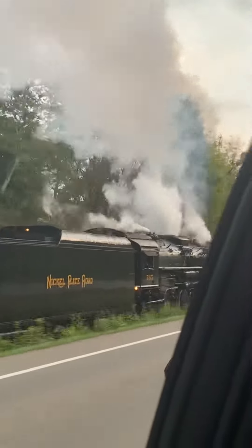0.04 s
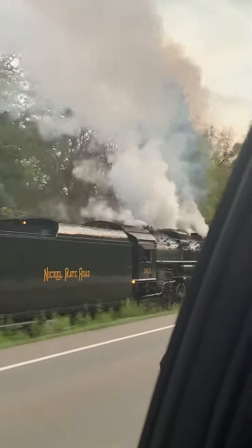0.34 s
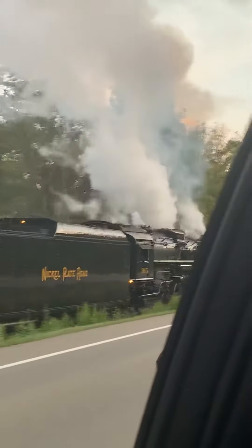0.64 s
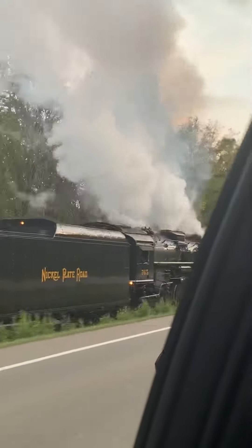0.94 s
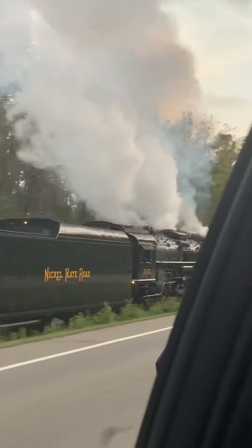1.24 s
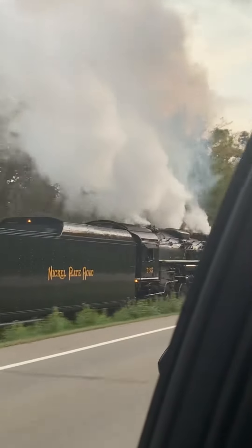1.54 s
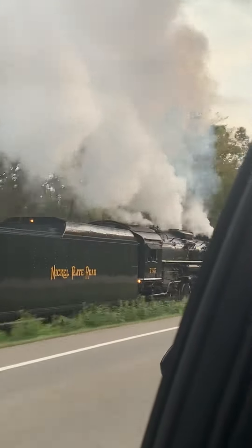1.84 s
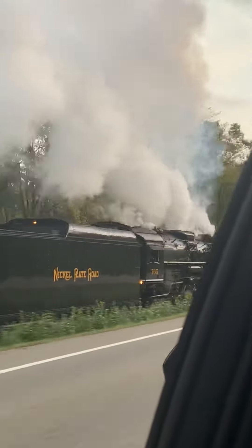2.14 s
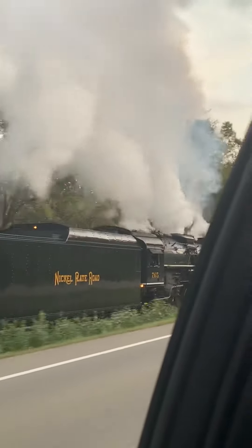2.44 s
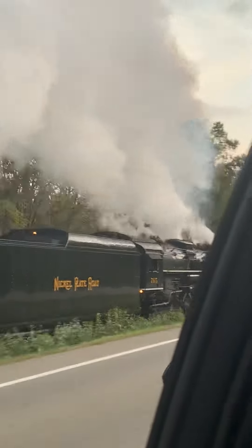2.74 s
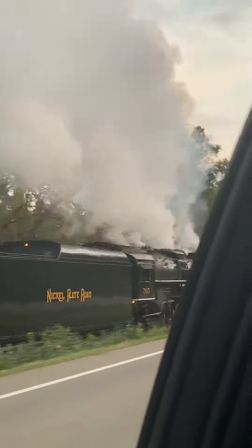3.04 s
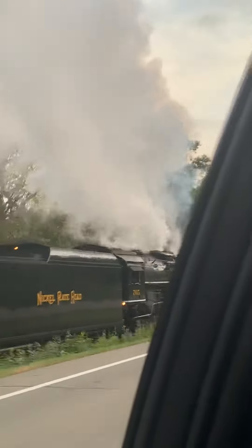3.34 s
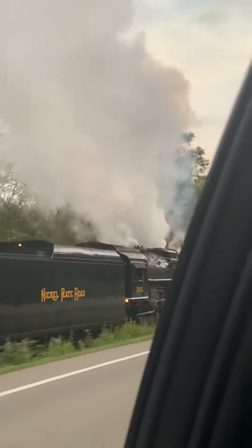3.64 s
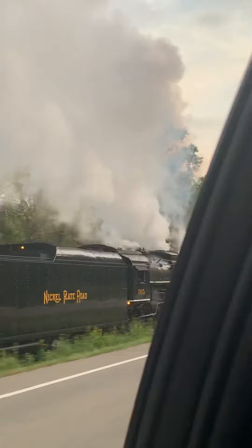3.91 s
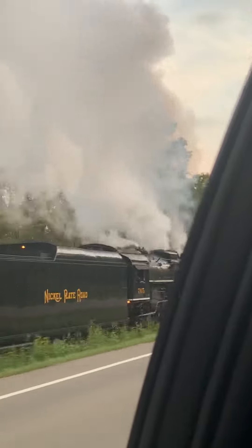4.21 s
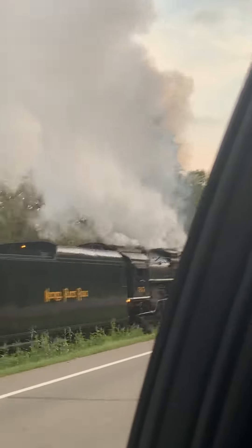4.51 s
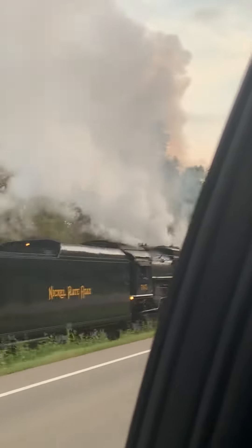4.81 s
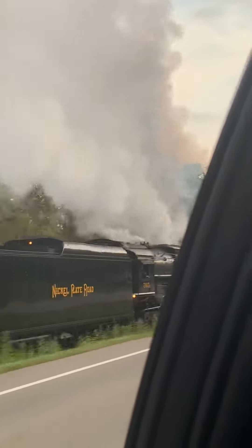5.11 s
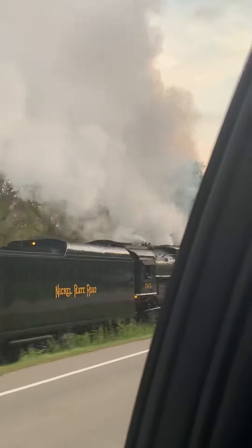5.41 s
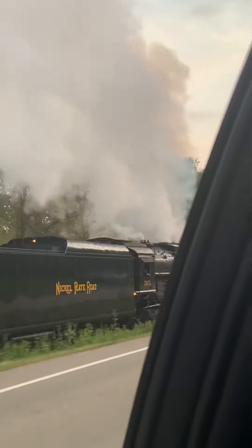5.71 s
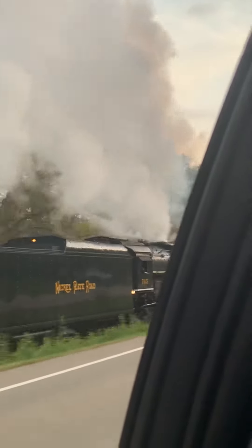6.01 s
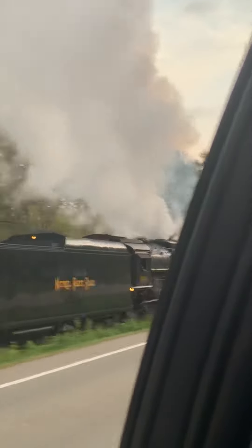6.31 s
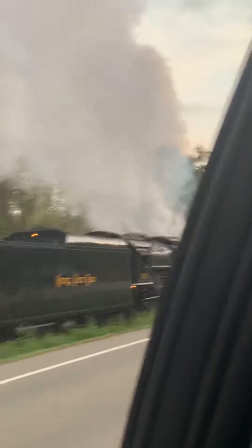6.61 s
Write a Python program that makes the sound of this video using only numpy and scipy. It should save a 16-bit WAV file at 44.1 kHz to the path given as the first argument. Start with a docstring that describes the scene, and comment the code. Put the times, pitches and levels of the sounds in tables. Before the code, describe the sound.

A steam locomotive sounds its whistle in one long, loud blast, a chord with a thin shriek flaring above it. The pitch creeps up, then sags as the whistle turns hoarse and a little quieter. Steam roars, hisses and spits throughout, and the engine and wheels rush along underneath. The microphone is at the open window of a car keeping pace, with close road rumble and gusts of wind.

```python
"""A loud chord from a steam locomotive's six-chime whistle, held in one long blast.
The microphone rides at the open window of a car that keeps pace on the road beside the train.
The chord rises with the steam pressure, then sags and turns hoarse as the valve eases. A shriek flares
above it and the steam jet roars, hisses and spits. Engine and wheels run alongside; close up are
road rumble and wind."""
import sys
import numpy as np
from scipy import signal
from scipy.fft import rfft, irfft, next_fast_len
from scipy.io import wavfile
from scipy.ndimage import uniform_filter1d, map_coordinates

SR = 44100
rng = np.random.default_rng(int(sys.argv[2]) if len(sys.argv) > 2 else 0)


def transcribe(signal):
    """Save signal, clipped to [-1, 1], as a 16-bit WAV file at the path in sys.argv[1]."""
    frames = np.atleast_2d(signal).T
    limited = np.clip(frames, -1, 1)
    pcm = np.round(limited * 32767).astype(np.int16)
    wavfile.write(sys.argv[1], SR, pcm)


N = 293706
TIME = np.arange(N) / SR


def amp(db):
    """Decibels to gain."""
    return 10 ** (np.asarray(db) / 20)


def unit(x):
    """x at rms 1."""
    return x / np.sqrt(np.mean(np.abs(x) ** 2) + 1e-20)


def along(points, hz):
    """(Hz, value) points read on a log axis."""
    freqs, values = np.transpose(points)
    return np.interp(np.log(hz + 1), np.log(freqs + 1), values)


def curve(rows):
    """(seconds, value) points joined into one value per sample."""
    return np.interp(TIME, *np.transpose(rows))


def bell(centre_s, width_s):
    """A bell-shaped swell of height 1."""
    return np.exp(-.5 * ((TIME - centre_s) / width_s) ** 2)


def swells(rows):
    """Gain that swells out of silence for each (seconds, dB, width) row."""
    return sum(amp(db) * bell(s, width) for s, db, width in rows)


def accents(rows):
    """A brief change of level, in dB, for each (seconds, dB, width) row."""
    return sum(db * bell(s, width) for s, db, width in rows)


def wobble(rate):
    """A smooth random curve, rate knots a second."""
    knots = rng.standard_normal(4096)
    coarse = np.arange(0, N + 32, 32)
    return np.interp(np.arange(N), coarse, map_coordinates(knots, [coarse * rate / SR], mode="wrap"))


def filtered(x, response):
    """x times a complex response of frequency."""
    size = next_fast_len(N + 8192)
    return irfft(rfft(x, size) * response(np.fft.rfftfreq(size, 1 / SR)), size)[..., :N]


def turbulence(spectrum, patchy_db):
    """Two unrelated noises of rms 1, the (shared, differing) stereo parts, with patches of random gain."""
    noise = signal.stft(rng.standard_normal((2, N)), nperseg=512)[2]
    patches = uniform_filter1d(rng.standard_normal(noise.shape[1:]), size=7, axis=0)
    patches = uniform_filter1d(patches, size=10, axis=1)
    pair = signal.istft(noise * amp(patchy_db * unit(patches)), nperseg=512)[1][:, :N]
    return unit(filtered(pair, lambda hz: amp(along(spectrum, hz))))


def flutter(width_hz):
    """The random complex envelope of a pipe resonance that turbulence drives."""
    coarse = np.arange(0, N + 32, 32)
    hz = np.fft.fftfreq(len(coarse), coarse[1] / SR)
    real, imag = rng.standard_normal((2, len(coarse)))
    resonance = 1 / (1 + 2j * hz / width_hz) / (1 + 1j * hz / (2 * width_hz))
    return np.interp(np.arange(N), coarse, unit(np.fft.ifft((real + 1j * imag) * resonance)))


def partial(phase, rough, width_hz):
    """A tone as (shared, differing) stereo parts; rough is the fraction of flutter in the shared part."""
    shared = np.sqrt(1 - rough) + np.sqrt(rough) * flutter(width_hz)
    carrier = np.sqrt(2) * np.exp(1j * (phase + rng.uniform(0, 2 * np.pi)))
    return (np.array([shared, flutter(width_hz)]) * carrier).real


def shaken(hz, jitter):
    """Phase of a pipe whose pitch the unsteady jet shakes."""
    return 2 * np.pi * np.cumsum(hz * (1 + jitter * wobble(35))) / SR


# Steam through the whistle valve. Each row: time in seconds, flow in dB relative to wide open.
VALVE_FLOW = [(0, -0.2), (1.3, 0), (1.85, -0.7), (2.2, -2), (3.2, -1.8), (3.85, -2.2), (4.4, -2.3),
              (4.8, -4), (5.4, -5.5), (5.9, -5), (6.66, -5.5)]

def driven(base_db, growth):
    """Level in dB of a voice that gains growth dB for each dB of steam flow."""
    return base_db + growth * curve(VALVE_FLOW)


# The chord's rise and sag, used as a ratio. Each row: time in seconds, guide pitch in Hz.
PITCH_ARC = [(0, 304.2), (.15, 310.4), (.32, 314), (.65, 315.9), (1.1, 317.1), (2, 319.2), (2.7, 319.8),
             (3.6, 321.9), (4.3, 319.9), (4.75, 314.3), (5.1, 309.4), (5.6, 305.7), (6.1, 302.4),
             (6.66, 301.7)]

def pressure():
    """Steam pressure as the ratio by which it bends the pitch: near 1 in the held part of the blast."""
    pitch = curve(PITCH_ARC)
    return pitch / np.median(pitch[:N * 2 // 3])


# Clean tone breaking up into flutter. Each row: time in seconds, hoarseness (0 is clean).
HOARSENESS = [(0, 0.35), (.25, 0.44), (.4, 0.17), (2, 0.22), (3, 0.29), (3.8, 0.46), (4.4, 0.4),
              (4.75, 0.3), (5.1, 1.07), (6.66, 1.4)]
# Overblowing moves the sound into the overtones. Each row: time in seconds, strength in dB.
OVERBLOWING = [(0, -1), (1.5, -1), (2.3, 1.5), (3.1, 4), (3.9, 3.5), (4.3, 0), (5, 0.5), (5.5, -4.5),
               (6.66, -4)]

def pipes(table, note_db, harmonics, width_hz, spread, jitter):
    """Pipes on one steam valve: they bend together, and their higher partials are broader and rougher."""
    hoarse, overblow_db = curve(HOARSENESS), curve(OVERBLOWING)
    lower_db = driven(-24.5, growth=.66) + overblow_db
    upper_db = driven(-24, growth=1.36) + .2 * overblow_db
    ratio = pressure()
    out = np.zeros((2, N))
    for hz, bend, roughness, *levels in table:
        phase = shaken(hz * ratio ** bend, jitter)
        for k, db in zip(harmonics, levels):
            drive_db = note_db if k == 1 else lower_db if k <= 3 else upper_db
            rough = 1 - np.exp(-hoarse * roughness * 1.24 * np.sqrt(k))
            out += amp(db + drive_db) * partial(phase * k, rough, width_hz * k ** spread)
    return out


# Three pairs of pipes, over on the locomotive. Each row: pitch in Hz at pressure 1, bend exponent,
# roughness factor, then a relative level in dB for each harmonic listed in whistle().
LONG_PIPES = [(319.5, 0.96, 0.52, -1.8, -14.5, -2, -12, -17, -19.5),
              (355.8, .9, 0.9, -7, -9, -29, -12.5, -18.5, -16.5)]
MIDDLE_PIPES = [(403.4, 1.05, 0.63, -1, -3, -9, -16, -25), (423.7, 1.05, 1.3, -6, -10.5, -14, -18.5, -28)]
SHORT_PIPES = [(548.4, 1.6, 1.42, -0.7, -7.5, -8, -15.5), (617, 1.2, 7.7, -12.5, -9, -12.5, -33)]
# The short pipes falter and catch again. Each row: centre in seconds, change in dB, width in seconds.
PIPE_STUTTERS = [(.6, 2.5, 0.32), (2.2, -3, 0.037), (2.44, 2, .03), (2.8, -6.5, 0.07), (3.2, 0, 0.034),
                 (3.56, -4, 0.037), (3.92, -5, 0.087), (4.24, 5.5, 0.052), (4.78, 6.5, .05),
                 (5.02, 4, 0.058), (6.55, -4.5, .12)]
# Steam noise at the pipe lips. Each row: frequency in Hz, relative level in dB.
LIP_SPECTRUM = [(200, -38), (265, -14), (305, 4.5), (360, 1), (425, 3), (470, -22), (600, -41)]

def whistle():
    """Six chimes sound a chord, rich in odd overtones, with noisy steam at their lips."""
    low_db, middle_db = driven(-15, growth=1.47), driven(-19, growth=.75)
    # The short pipes' fundamentals come up late and give way when they overblow.
    speak_s, rise_s = .26, .087
    late_db = -6 * np.clip((speak_s - TIME) / rise_s + .5, 0, 1)
    give_way_db = -.35 * np.maximum(curve(OVERBLOWING), 0)
    high_db = driven(-19, growth=1.01) + late_db + give_way_db + accents(PIPE_STUTTERS)
    low = pipes(LONG_PIPES, low_db, (1, 3, 5, 7, 9, 11), width_hz=27, spread=.57, jitter=.00298)
    middle = pipes(MIDDLE_PIPES, middle_db, (1, 3, 5, 7, 9), width_hz=20, spread=.36, jitter=.00303)
    high = pipes(SHORT_PIPES, high_db, (1, 2, 4, 5), width_hz=31.5, spread=.6, jitter=.00394)
    lips = amp((low_db + middle_db) / 2 - 9.5) * turbulence(LIP_SPECTRUM, patchy_db=-1)
    return low + middle + high + lips


# The shriek flares above the chord. Each row: centre in seconds, gain in dB, width in seconds.
SHRIEK_FLARES = [(.02, 6, 0.051), (.24, 7, 0.11), (.8, 10, .03), (.96, 3.5, 0.057), (1.46, 8.5, 0.055),
                 (2.75, 2.5, 0.28), (3.87, 5.5, 0.076), (5.03, 4.5, 0.12), (5.91, 9.5, 0.044)]

def shriek():
    """A short pipe overblows into a piercing mode that bends with the chord and frays as the valve eases."""
    rough = 1 - np.exp(-1.96 * curve(HOARSENESS))
    level_db = driven(-23, growth=.75) + accents(SHRIEK_FLARES) + 1.36 * wobble(14)
    phase = shaken(hz=1625 * pressure() ** .88, jitter=.0027)
    return amp(level_db) * partial(phase, rough, width_hz=62)


# Steam roar, hiss and top sizzle, coloured by the recorder, which lifts the treble abruptly above 8 kHz.
# Each row: frequency in Hz, relative level in dB.
ROAR_SPECTRUM = [(900, -41), (1500, -16.5), (1780, 0), (1980, 2), (2200, -2), (2340, -5.5), (2550, -4),
                 (2850, -6.5), (3050, -9.5), (3600, -11.5), (4500, -10), (6500, -114)]
HISS_SPECTRUM = [(2500, -10), (3600, 5), (4500, -10), (5500, 6), (6400, 1), (6800, 5), (7300, 1),
                 (7900, 0.5), (9000, -12)]
SIZZLE_SPECTRUM = [(7000, -50), (7880, -49), (8040, 4.5), (8800, -3), (9700, -0.5), (11200, -4.5),
                   (12600, -6), (14500, -12.5), (15800, -15)]
# The hiss puffs up. Each row: centre in seconds, gain in dB, width in seconds.
HISS_PUFFS = [(.2, 1, .04), (1.9, 1.5, 0.045), (3.85, 3, 0.13), (4.35, 1.5, 0.061), (6.28, 5, .08)]
# Wetter steam sizzles more. Each row: time in seconds, gain in dB.
STEAM_WETNESS = [(0, 0.5), (.45, -1.3), (1, 1.8), (1.65, 2), (2.1, -1.3), (3.4, -1.5), (4.4, -3.5),
                 (5.3, -1.5), (6.66, -4.5)]

def steam_jet():
    """The jet roars at the lips and hisses as it spreads; it surges slightly at each driving-wheel turn."""
    turn_s, fade_db_per_s = .44, .3
    surge_db = .12 * np.cos(2 * np.pi * (TIME - 1.9) / turn_s)
    unsteady_db = surge_db + .5 * wobble(45)  # eddies shake the jet
    roar_db = driven(-22, growth=.63) - fade_db_per_s * TIME + unsteady_db
    roar = amp(roar_db) * turbulence(ROAR_SPECTRUM, patchy_db=1.98)
    hiss_db = driven(-28.5, growth=.98) + accents(HISS_PUFFS) + unsteady_db
    hiss = amp(hiss_db) * turbulence(HISS_SPECTRUM, patchy_db=1.7)
    sizzle_db = driven(-25.5, growth=.52) + curve(STEAM_WETNESS) + 1.3 * unsteady_db + .44 * wobble(20)
    sizzle = amp(sizzle_db) * turbulence(SIZZLE_SPECTRUM, patchy_db=1.5)
    return roar + hiss + sizzle


# Wheels and engine, abreast of the car. Each row: frequency in Hz, relative level in dB.
WHEEL_SPECTRUM = [(60, -15), (140, 0.5), (240, -6), (340, -5), (470, -12.5), (620, -5.5), (780, -11.5),
                  (1000, -8.5), (2000, -56)]
ENGINE_SPECTRUM = [(500, -11), (800, -18.5), (900, -5.5), (1000, -1.5), (1150, 3), (1350, 3.5), (1500, 4.5),
                   (1640, 8), (1740, -0.5), (1900, -16), (3000, -31)]
# Their swells and dips. Each row: centre in seconds, change in dB, width in seconds.
WHEEL_ACCENTS = [(.15, 9, .15), (.95, 3, 0.067), (1.5, -3.5, 0.2), (1.95, 3, 0.11), (4.45, 4.5, 0.14),
                 (5.2, -2, 0.24), (6.25, 4, 0.11)]
ENGINE_ACCENTS = [(1.7, -1, 0.066), (3.88, 3, 0.073), (5.06, 3.5, 0.029), (5.8, 3, 0.16),
                  (6.25, 3.5, 0.061)]

def running_train():
    """The engine and its wheels rush along at a constant distance from the microphone."""
    wheel_db = -26.5 + accents(WHEEL_ACCENTS) + 1.9 * wobble(18)
    wheels = amp(wheel_db) * turbulence(WHEEL_SPECTRUM, patchy_db=3.5)
    engine_db = -23.5 + accents(ENGINE_ACCENTS) + .95 * wobble(14)
    return wheels + amp(engine_db) * turbulence(ENGINE_SPECTRUM, patchy_db=2)


# Road and wind, close to the microphone. Each row: frequency in Hz, relative level in dB.
RUMBLE_SPECTRUM = [(8, -12), (25, -2), (50, 1.5), (75, 0.5), (120, -6.5), (180, -16), (400, -57)]
# Gusts at the window. Each row: centre in seconds, level in dB, width in seconds.
WIND_GUSTS = [(.03, -20, 0.035), (.15, -22, 0.034), (.66, -24.5, 0.14), (1.53, -23, 0.022),
              (1.66, -28, 0.022), (2.06, -26, 0.09), (2.63, -23, 0.02), (2.93, -19, 0.023),
              (3.6, -22, 0.034), (4.35, -21.5, 0.034), (5.68, -22, 0.034), (6.09, -23, .05),
              (6.38, -23, .035), (6.54, -27, 0.028)]

def window_rumble():
    """Road rumble and gusts of wind come in at the open car window."""
    gain = amp(-24.5 + 1.5 * wobble(12)) + swells(WIND_GUSTS)
    return gain * turbulence(RUMBLE_SPECTRUM, patchy_db=.5)


# Spits from the whistle. Each row: centre in seconds, level in dB, width in seconds.
SPIT_BURSTS = [(.07, -30, 0.024), (1.84, -20, 0.021), (2.53, -25, 0.04), (3.21, -24, .03),
               (4.87, -25.5, 0.072), (5.91, -25, .03), (6.28, -30, .04)]
# Their bright colour. Each row: frequency in Hz, relative level in dB.
SPIT_SPECTRUM = [(4000, -27), (7500, -2.5), (9000, 2), (12000, -4.5), (15800, -5)]

def spits():
    """Now and then the jet spits wet steam."""
    return swells(SPIT_BURSTS) * turbulence(SPIT_SPECTRUM, patchy_db=1.5)


# Sputters within the chord. Each row: centre in seconds, level in dB, width in seconds.
SPUTTER_BURSTS = [(1.1, -24, 0.03), (2.9, -26.5, 0.043), (3.3, -23, 0.042), (3.47, -24.5, 0.027),
                  (3.66, -28, 0.033), (4.1, -28, 0.05), (4.25, -25, 0.026), (4.37, -17, 0.02)]
# Their hollow colour. Each row: frequency in Hz, relative level in dB.
SPUTTER_SPECTRUM = [(450, -35), (560, -1), (630, 2), (700, -10), (850, -20), (1200, -50)]

def sputters():
    """The short pipes sputter in bursts of noise near their own pitch."""
    return swells(SPUTTER_BURSTS) * turbulence(SPUTTER_SPECTRUM, patchy_db=1)


# A thump right by the microphone. Each row: centre in seconds, level in dB, width in seconds.
HARD_GUST = [(3.77, -13.5, .02)]
# Its deep colour. Each row: frequency in Hz, relative level in dB.
THUMP_SPECTRUM = [(20, -8), (45, 0), (110, -4), (190, -1), (270, -15), (700, -28), (2000, -55)]

def gust_thump():
    """One harder gust thumps at the window."""
    return swells(HARD_GUST) * turbulence(THUMP_SPECTRUM, patchy_db=.5)


# How alike the left and right channels are. Each row: frequency in Hz, coherence from 0 to 1.
CHANNEL_COHERENCE = [(50, .99), (160, .88), (400, .86), (600, .8), (800, .58), (1100, .94), (1600, .99),
                     (2200, .92), (3100, .79), (4000, .86), (4700, .998), (5100, .998), (5800, .87),
                     (7000, .94), (9100, .98), (15000, .94)]
# How far the left channel leads the right. Each row: frequency in Hz, lead of the left in radians.
LEFT_LEAD = [(50, 0), (300, -.33), (620, -.7), (830, -.2), (1100, -.2), (1500, 0), (1900, .1), (3000, .94),
             (4000, 1.9), (4600, 2.85), (5200, 3.35), (6400, 6), (7500, 6.5), (8500, 9.1), (9600, 9.7),
             (10400, 12.3), (11600, 12.6), (12500, 15.4), (13700, 15.9), (14600, 18.8), (15800, 18.9)]

def stereo(pair):
    """A shared part and a differing part give slight stereo width, with a small lag between channels."""
    def weights(hz):
        angle = np.arccos(np.clip(along(CHANNEL_COHERENCE, hz), 0, 1)) / 2
        return np.array([np.cos(angle), np.sin(angle)])

    def lag(hz):
        lead = np.interp(hz, *np.transpose(LEFT_LEAD))
        return np.exp(.5j * np.outer([1, -1], lead))

    shared, differing = filtered(pair, weights)
    return filtered(np.array([shared + differing, shared - differing]), lag)


def scene():
    """Everything reaches the microphone through the car's side window."""
    locomotive = whistle() + sputters() + shriek() + steam_jet() + spits() + running_train()
    close_by = gust_thump() + window_rumble()
    return stereo(locomotive + close_by)


def record(dry):
    """The camera rounds off the highest peaks and keeps nothing above its band limit."""
    top_hz = 15800
    rounded = dry / (1 + np.abs(dry) ** 8) ** (1 / 8)
    return filtered(rounded, lambda hz: hz < top_hz)


dry = scene()
out = record(dry)
transcribe(out)
```